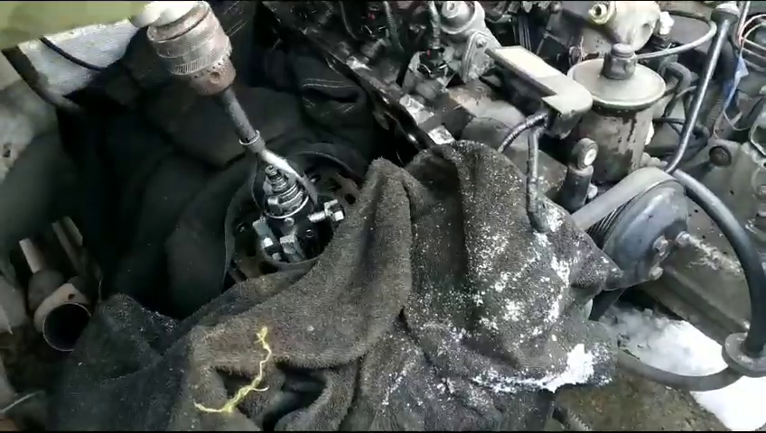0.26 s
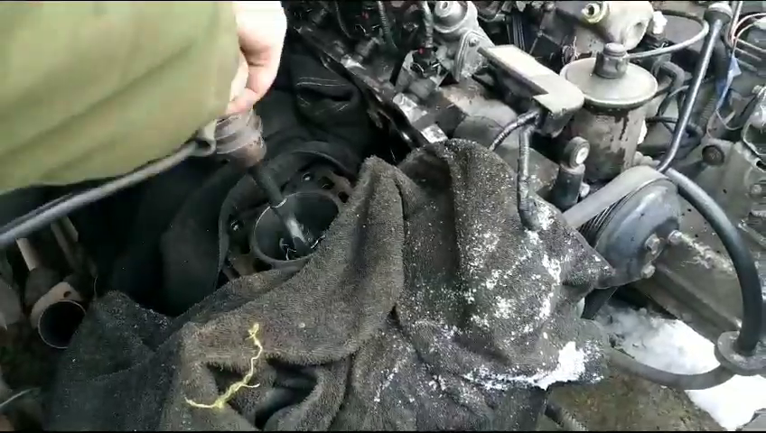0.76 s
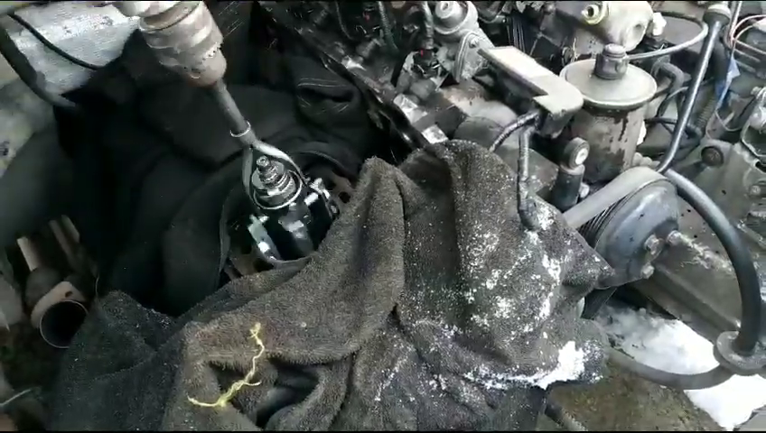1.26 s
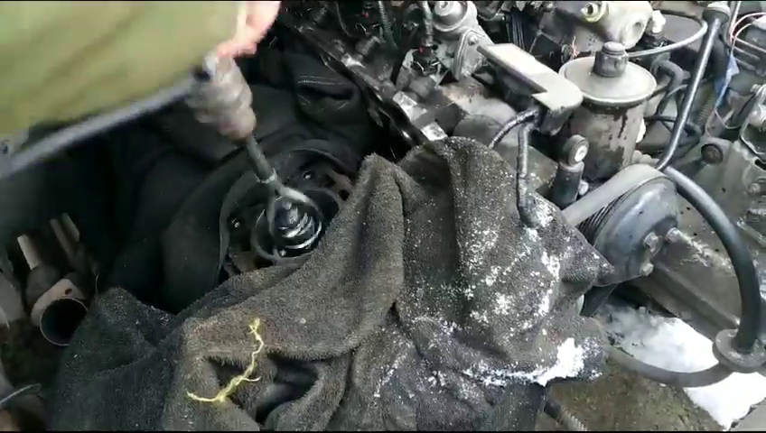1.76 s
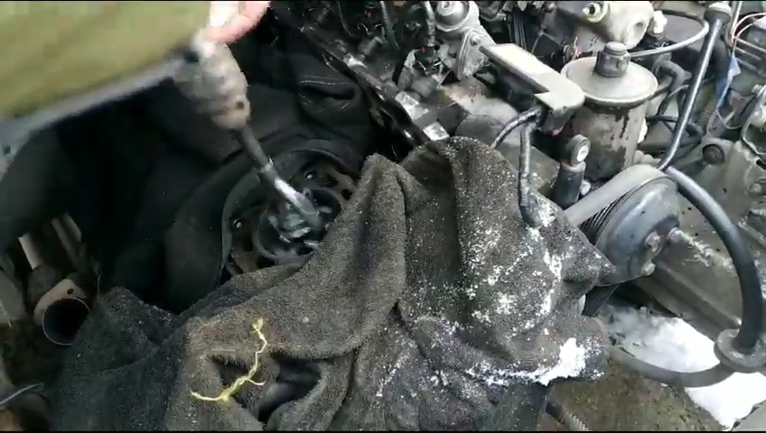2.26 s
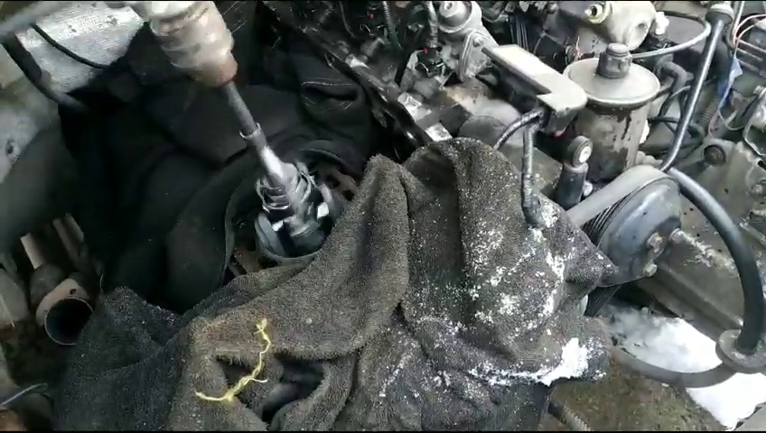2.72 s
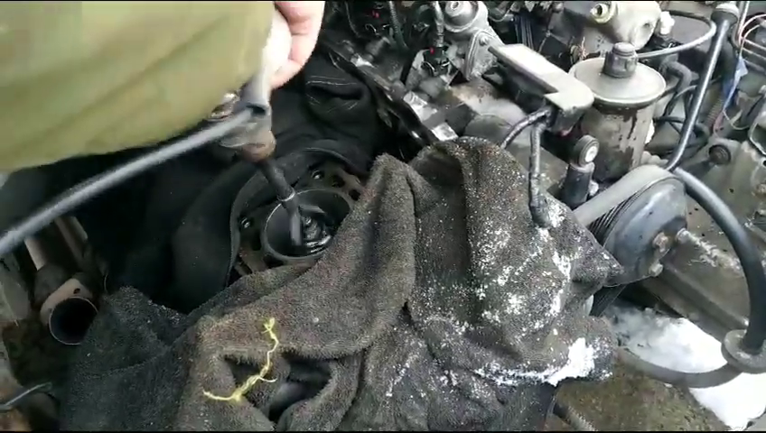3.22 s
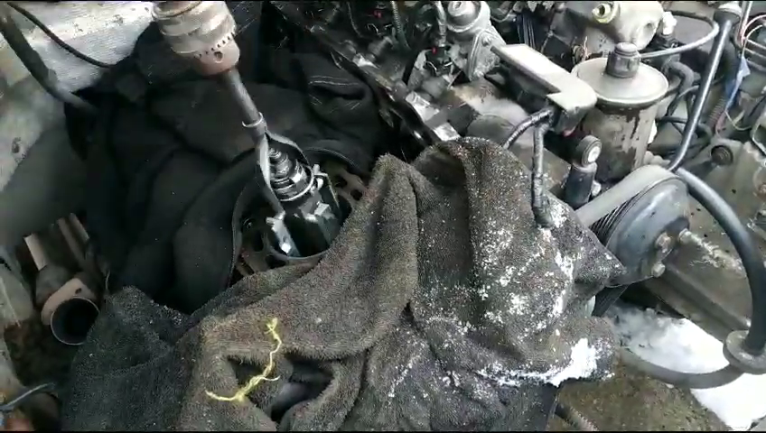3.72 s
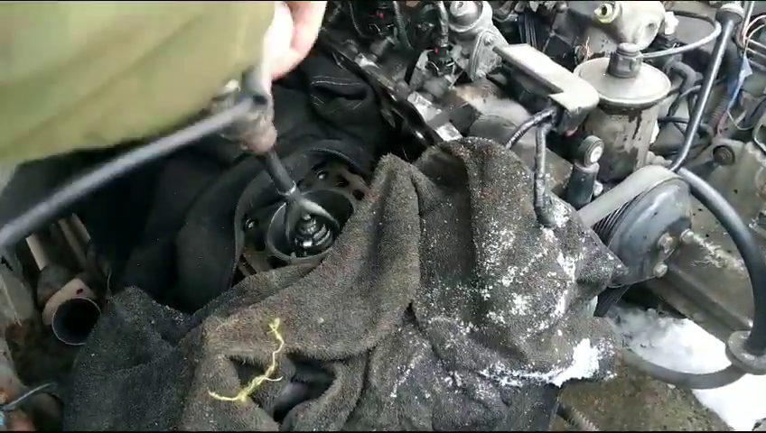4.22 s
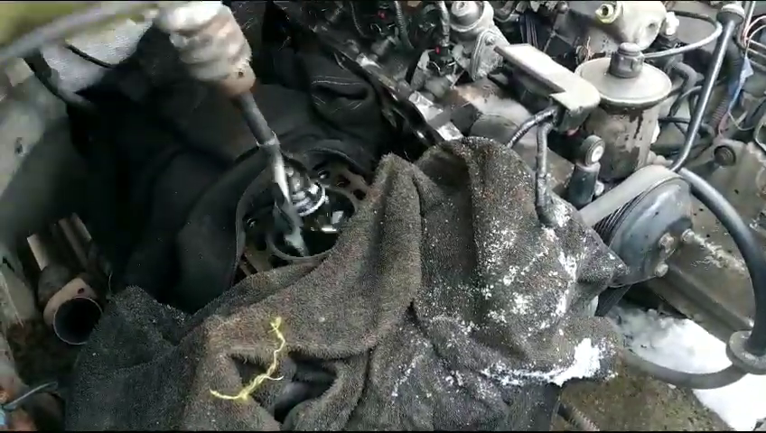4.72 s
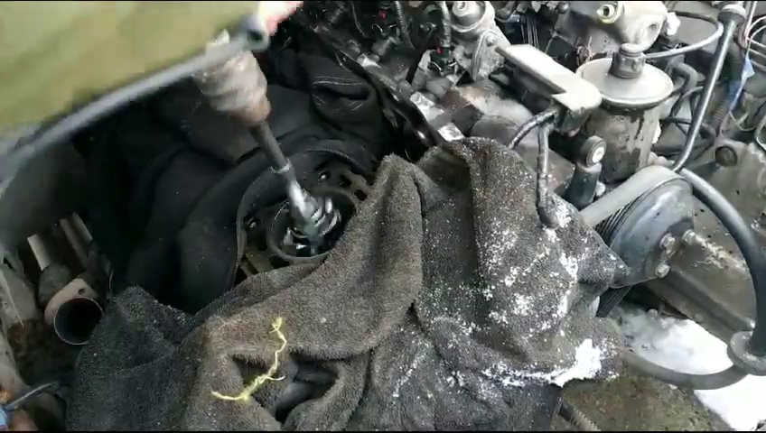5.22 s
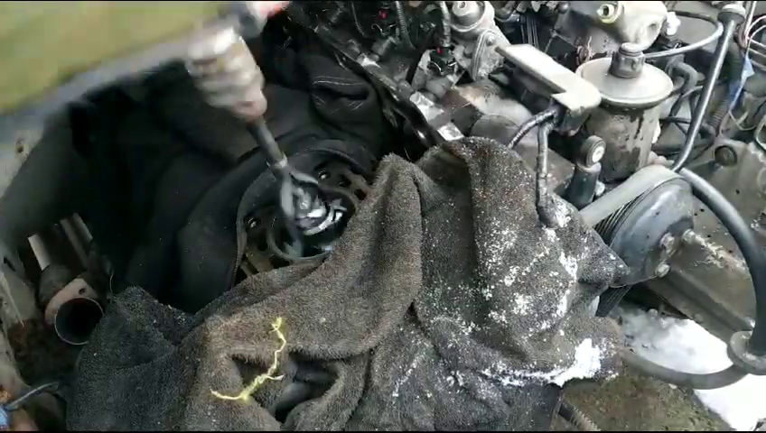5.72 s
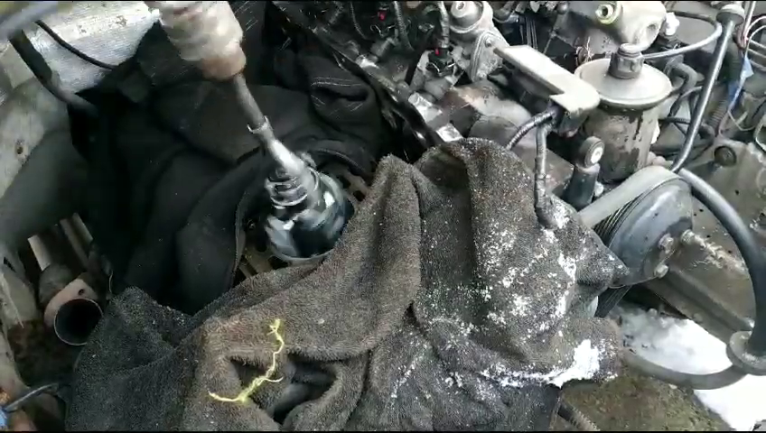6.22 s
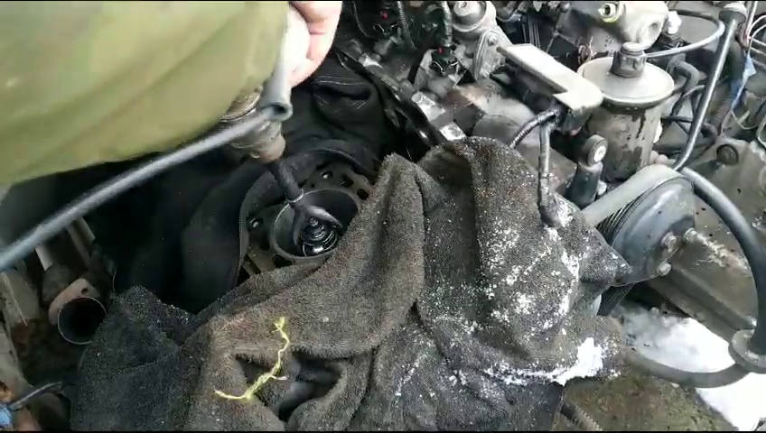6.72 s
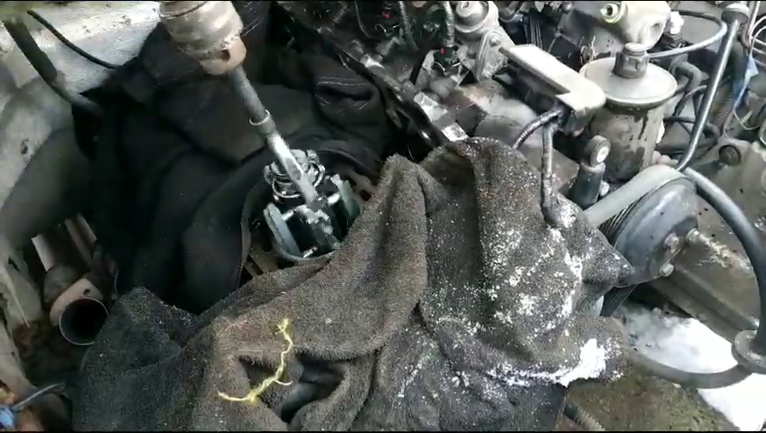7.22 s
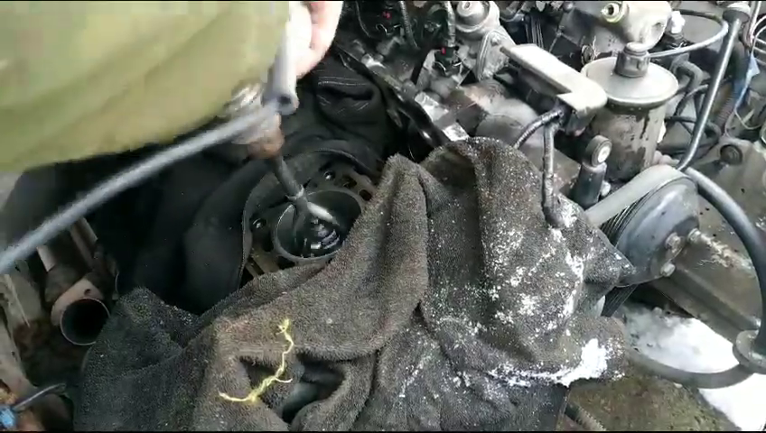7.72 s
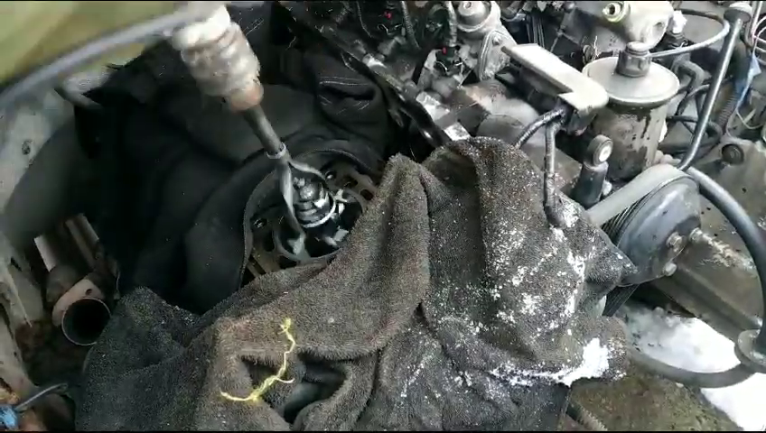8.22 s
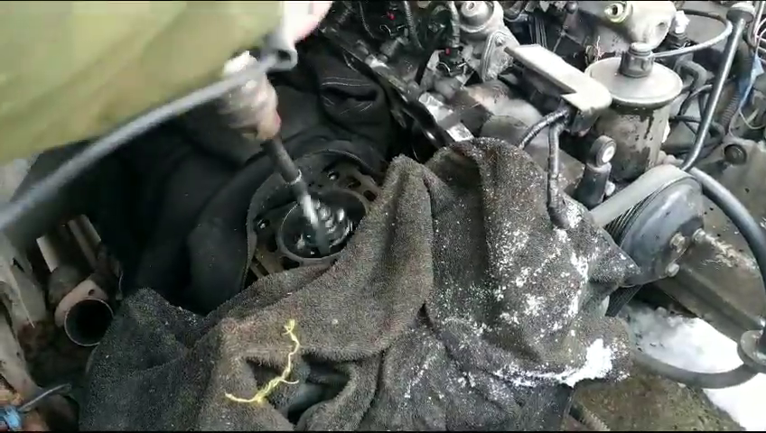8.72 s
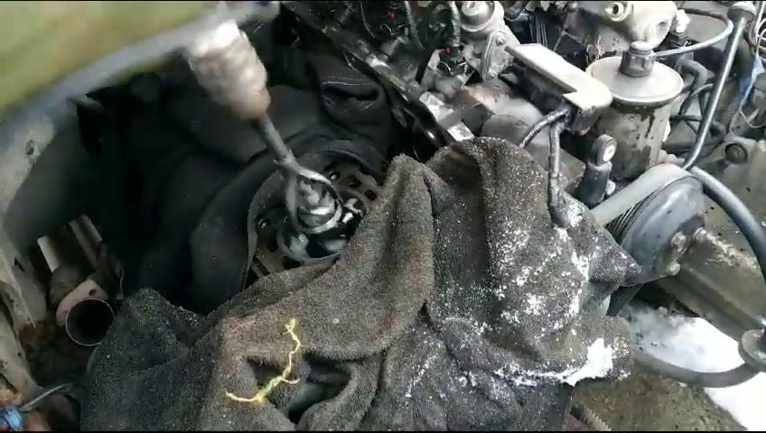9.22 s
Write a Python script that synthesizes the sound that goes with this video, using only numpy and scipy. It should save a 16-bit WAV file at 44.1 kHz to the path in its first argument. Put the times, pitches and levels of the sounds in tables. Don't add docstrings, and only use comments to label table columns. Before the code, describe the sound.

An electric drill whirs in short repeated surges, each whine rising fast and gliding down to a gritty stop inside an engine cylinder.

```python
import sys
import numpy as np
from scipy import signal
from scipy.fft import rfft, irfft
from scipy.io import wavfile
from scipy.ndimage import uniform_filter1d

SR = 44100
rng = np.random.default_rng(int(sys.argv[2]) if len(sys.argv) > 2 else 0)


def unload_wav(signal):
    wavfile.write(
        sys.argv[1],
        SR,
        np.round(np.clip(np.atleast_2d(signal).T, -1, 1) * 32767).astype(np.int16),
    )


def volts(x):
    e = np.asarray(x, float) / 20
    return 10 ** e


N = 417186
TIME = np.arange(N) / SR
TEETH, SLOTS, WHEEL = 7, 12, 43
LEFT_LAG = 13

# start_s, held_s, top_tooth_rate_hz, first_braking_hz_per_s, coast_s
PULLS = [(-0.23, 0.097, 1170, 3051, 0.312), (0.335, 0.125, 1221, 2807, 0.417),
         (0.885, 0.119, 1273, 2790, 0.409), (1.519, 0.133, 1307, 2758, 0.441),
         (2.073, 0.097, 1187, 2470, 0.386), (2.68, 0.127, 1265, 2783, 0.43),
         (3.229, 0.104, 1141, 3145, 0.408), (3.826, 0.129, 1208, 3377, 0.426),
         (4.395, 0.075, 1012, 2962, 0.378), (4.989, 0.138, 1248, 3162, 0.458),
         (5.555, 0.111, 1275, 3245, 0.428), (6.173, 0.151, 1381, 2994, 0.43),
         (6.742, 0.112, 1312, 3101, 0.409), (7.329, 0.129, 1339, 3072, 0.469),
         (7.896, 0.074, 950, 2913, 0.368), (8.486, 0.121, 1237, 2898, 0.443),
         (9.03, 0.103, 1242, 2903, 0.437)]
# multiple_of_tooth_rate, level_db
GEAR_LINES = [(1, -5.5), (2, -5.0), (3, -1.0), (4, -6.0), (5, -4.5), (6, -4.0), (7, -2.5), (8, -6.5),
              (9, -6.5), (10, -8), (11, -11), (12, -8), (13, -10.5), (14, -12)]
# multiple_of_bar_rate, level_db
BAR_LINES = [(1, -9.0), (2, -19.0)]
# pitch_hz, level_db (per Hz)
CASING = [(50, -80), (100, -51.5), (213, -17), (295, -21), (420, -13), (860, -7), (1100, -11), (1700, -1),
          (2300, -2), (3200, -7), (5800, -10), (6800, -49.5), (10700, -21.5), (15800, -16)]
# pitch_hz, width_hz, level_db
RINGS = [(874, 11, -5), (1773, 48, -1.5), (2203, 330, 1.5), (2556, 300, -1), (3420, 150, -9.5),
         (6300, 350, -10), (7600, 690, -2.5), (8640, 2300, -9), (11550, 310, -12.5), (15740, 480, -11)]
# pitch_hz, level_db
SING = [(300, -24), (800, -12), (1300, -2.5), (2700, -1.5), (3600, -5.5), (5800, -5.5), (7600, 0),
        (10000, -2.5), (16000, -5), (18000, -60)]
# pitch_hz, level_db
LEFT_TILT = [(60, -0.5), (110, -1.0), (200, -1.5), (380, -2.0), (700, -1.5), (1290, 1.5), (2380, 3.5),
             (4400, 0.5), (8120, 0.5), (15000, -1.0)]
# pitch_hz, level_db
OWN_RATTLE = [(200, -17.0), (700, -14.0), (1300, 0.5), (2500, 5.5), (6000, 3.0), (15000, 2.0)]
# start_s, peak_db, pitch_hz, t60_s
TICKS = [
    (.312, -41, 650, .04),
    (2.64, -53, 900, .02),
    (4.951, -41, 7600, 0.014),
    (8.4255, -41, 2500, 0.028),
    (8.447, -44, 1500, 0.032),
]
# pitch_hz, level_db (per Hz)
SHOP_AIR = [(18, -44), (30, -69), (235, -3.5), (268, -7), (979, -14), (6900, -25.5), (10800, -24.5),
            (14800, -28), (16500, -15.5)]


def unit(x):
    return x / np.sqrt(np.mean(x ** 2))


def shape_db(points, hz):
    at, db = np.transpose(points)
    return np.interp(np.log(hz + 1), np.log(at), db)


def colour(x, db_of, size=4096):
    ceps = irfft(db_of(np.fft.rfftfreq(size, 1 / SR)) * np.log(10) / 20)
    ceps[1:size // 2] *= 2
    ceps[size // 2 + 1:] = 0
    return signal.fftconvolve(x, irfft(np.exp(rfft(ceps))))[:len(x)]


def walk(rate):
    k = int(SR / rate)
    held = np.repeat(rng.standard_normal(N // k + 1), k)
    return uniform_filter1d(uniform_filter1d(held, k), k)[:N]


def late(x, count):
    return np.concatenate([np.zeros(count), x[:N - count]])


def shop():
    mid, left, right = (colour(rng.standard_normal(N), lambda hz: shape_db(SHOP_AIR, hz)) for _ in range(3))
    air = unit(np.array([mid + 1.1 * left, mid + 0.6 * right]))
    return volts(-48 + 0.54 * walk(5.2)) * air


def tail(t60):
    t = np.arange(SR // 2) / SR
    cloud = rng.standard_normal(len(t)) * np.exp(-np.log(1000) * t / t60) * (t > .0007)
    return cloud / np.sqrt(np.sum(cloud ** 2))


def shop_echo(near):
    return volts(-24) * signal.oaconvolve(near, tail(t60=.25))[:N]


def bay_echo(near, count, rate):
    shares = np.array([walk(rate) for _ in range(count)])
    shares = shares / np.sqrt(np.sum(shares ** 2, axis=0))
    return volts(-3) * sum(signal.oaconvolve(near * share, tail(t60=.025)[:2048])[:N] for share in shares)


def ticks():
    out, t = np.zeros(N + 2048), np.arange(2048) / SR
    for start, db, hz, t60 in TICKS:
        band = signal.butter(1, [.6 * hz, 1.5 * hz], "band", fs=SR, output="sos")
        click = signal.sosfilt(band, rng.standard_normal(2048))
        out[int(start * SR):][:2048] += volts(db) * unit(click) * np.exp(-np.log(1000) * t / t60)
    return out[:N]


def jolts(thump_hz=70):
    out, t = np.zeros(N + 4096), np.arange(4096) / SR
    for start, *_ in PULLS[1:]:
        snap_db = -39 + 5 * rng.standard_normal()
        snap = volts(snap_db) * np.diff(rng.standard_normal(4097)) * np.exp(-t / 0.0076)
        thump = volts(-59) * np.sin(2 * np.pi * thump_hz * t) * np.exp(-t / .014)
        out[int(start * SR):][:4096] += snap + thump
    return out[:N]


def tooth_rate():
    seize_hz, bend_from_rest, bend_spinning = 95, 1.95, 1.55
    hz = np.zeros(N)
    for pull, held, top, brake, lasts in PULLS:
        start = max(int(pull * SR), 0)
        t = TIME[start:] - pull
        coast = np.clip(t - held, 0, .55)
        ease = (seize_hz - top + brake * lasts) / lasts ** 2
        bend = bend_spinning if hz[start] > 0 else bend_from_rest
        wind_up = (top - hz[start]) * (1 - np.clip(t / held, 0, 1)) ** bend
        speed = top - wind_up - brake * coast + ease * coast ** 2
        hz[start:] = np.where(t - held < lasts + .03, np.maximum(speed, 0), 0)
    return hz


def loudness(hz):
    silent_hz, knee_hz, reference_hz = 75, 346, 717
    starts = np.array(PULLS)[:, 0]
    since = TIME - starts[np.searchsorted(starts, TIME, "right") - 1]
    push = volts(-10.5) * np.exp(-since / 0.09)
    moving = np.maximum(hz - silent_hz, 0)
    load = volts(-18) * np.hypot(moving / np.hypot(moving, knee_hz), push)
    brisk = np.maximum(hz, silent_hz) / reference_hz
    rasp = brisk ** 0.37 + 0.76 * push
    rumble = brisk ** 0.57 + 3.0 * push
    return load, rasp, rumble


def whine(hz, orders, wobble, patchy_db):
    turns = np.cumsum(hz) / SR + wobble * walk(300)
    turns = turns + .008 * np.sin(2 * np.pi * turns / TEETH)
    lines = 0
    for k, db in orders:
        gain = volts(db + shape_db(SING, k * hz[::8]) + patchy_db * walk(70)[::8])
        lines = lines + np.repeat(gain, 8)[:N] * np.sin(2 * np.pi * k * turns)
    return lines


def rattle(hz, tooth_db, stone_db, grit_db, depth):
    teeth = np.cumsum(hz) / SR
    index = teeth.astype(int)
    wear = rng.standard_normal(TEETH)[index % TEETH] + rng.standard_normal(N // 20)[index]
    strike = 1 - depth + depth * np.exp(-(teeth % 1) / 0.22)
    throb = np.sin(2 * np.pi * teeth / WHEEL) + 0.3 * np.sin(2 * np.pi * 3 * teeth / WHEEL)
    return unit(strike * volts(tooth_db * wear + stone_db * throb + grit_db * walk(45)))


def casing_db(hz):
    broad = shape_db(CASING, hz)
    rings = sum(volts(db) ** 2 / (1 + (2 * (hz - f) / width) ** 2) ** 2 for f, width, db in RINGS)
    return 10 * np.log10(volts(broad) ** 2 + rings)


def microphone(shared, clatter, load, tilt, lag):
    def heard_db(f):
        both_db = 10 * np.log10(1 + volts(shape_db(OWN_RATTLE, f)) ** 2)
        return casing_db(f) + tilt * shape_db(LEFT_TILT, f) / 2 - both_db

    own = colour(clatter * rng.standard_normal(N), lambda f: shape_db(OWN_RATTLE, f))
    return colour(late(load * (shared + own), count=lag), heard_db)


def drill():
    hz = tooth_rate()
    clatter = rattle(hz, tooth_db=1.0, stone_db=-0.02, grit_db=2.6, depth=0.16)
    coasting = volts(np.where(np.gradient(hz) > 0, -1.0, 0))
    lines = whine(hz, GEAR_LINES, wobble=.018, patchy_db=3.2)
    lines = lines + whine(hz * SLOTS / TEETH, BAR_LINES, wobble=.03, patchy_db=3.5)
    shared = clatter * rng.standard_normal(N) + uniform_filter1d(coasting, size=512) * lines
    load, rasp, rumble = loudness(hz)
    left = microphone(shared, clatter, load, tilt=0.05, lag=LEFT_LAG)
    right = microphone(shared, clatter, load, tilt=-2.5, lag=0)
    sound = np.array([left, right])
    high = signal.sosfiltfilt(signal.butter(2, 5000, "high", fs=SR, output="sos"), sound)
    low = signal.sosfiltfilt(signal.butter(2, 700, fs=SR, output="sos"), sound)
    body = sound - low - high
    return np.std(load) / np.std(body) * (body + rasp * high + rumble * low)


def scene():
    small = ticks() + jolts()
    near = volts(8.0) * drill() + np.array([late(small, count=LEFT_LAG), small])
    thin = signal.sosfilt(signal.butter(2, 600, "high", fs=SR, output="sos"), near)
    echoes = [bay_echo(x, count=2, rate=7) + shop_echo(x) for x in thin]
    return near + np.array(echoes) + shop()


def low_pass(x):
    return signal.sosfilt(signal.butter(12, 17070, fs=SR, output="sos"), x)


def record(dry):
    over = np.maximum(np.abs(dry) - .55, 0)
    rounded = dry - np.sign(dry) * (over - .22 * np.tanh(over / .22))
    thin = signal.sosfilt(signal.butter(3, 100, "high", fs=SR, output="sos"), rounded)
    mix = signal.sosfilt(signal.ellip(12, .2, 75, 15720, fs=SR, output="sos"), thin)
    return low_pass(mix)


dry = scene()
out = record(dry)
unload_wav(out)
```